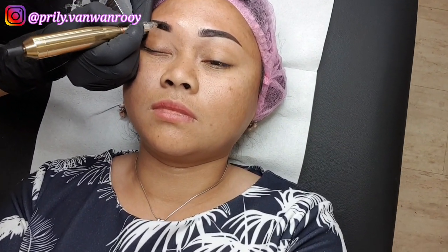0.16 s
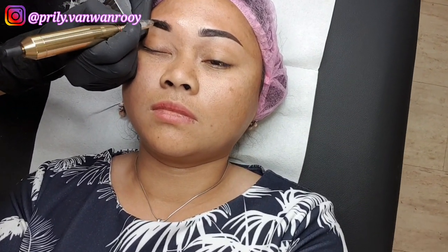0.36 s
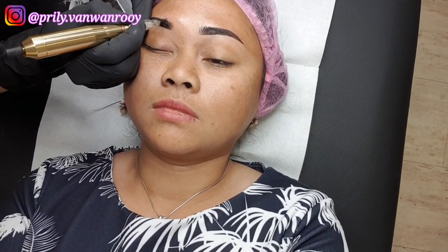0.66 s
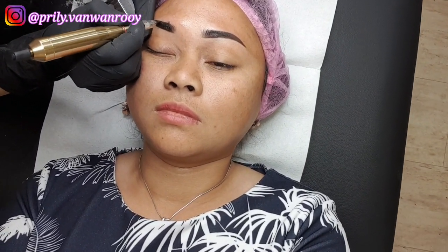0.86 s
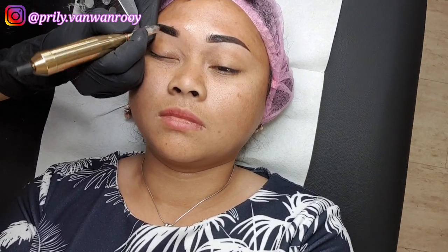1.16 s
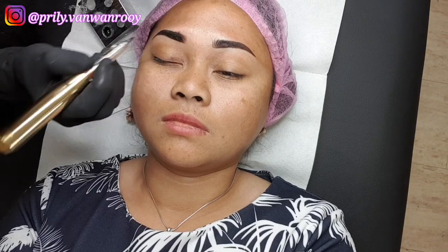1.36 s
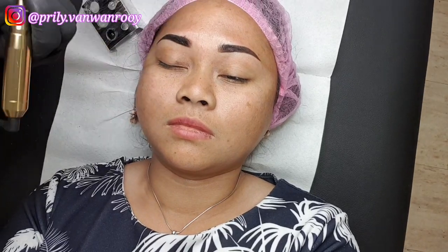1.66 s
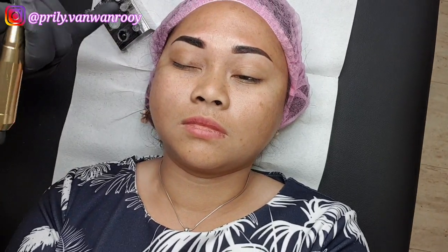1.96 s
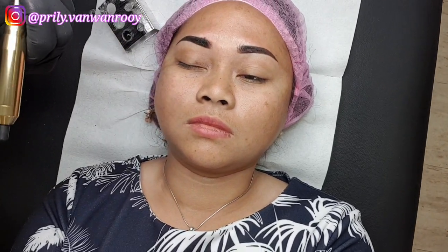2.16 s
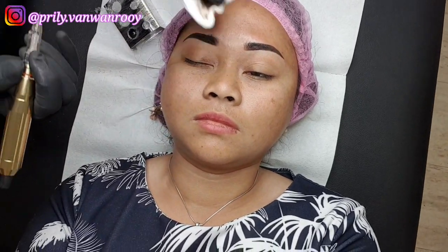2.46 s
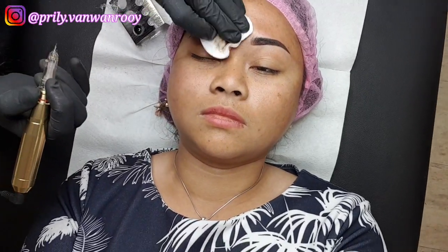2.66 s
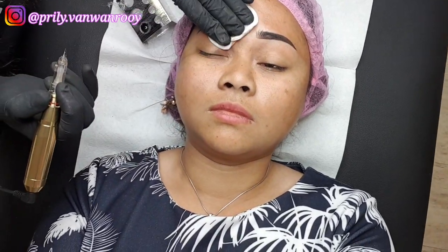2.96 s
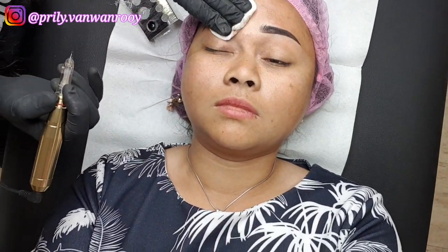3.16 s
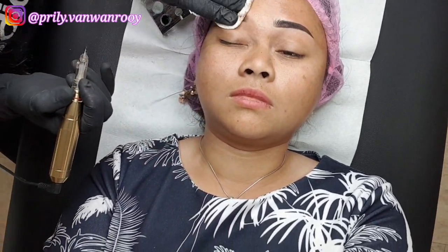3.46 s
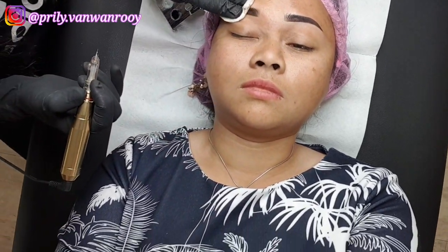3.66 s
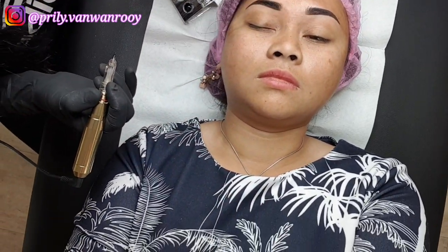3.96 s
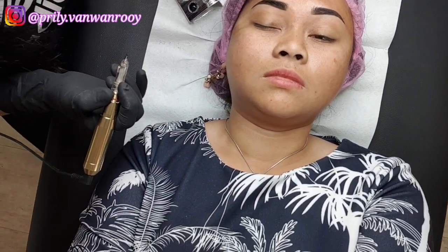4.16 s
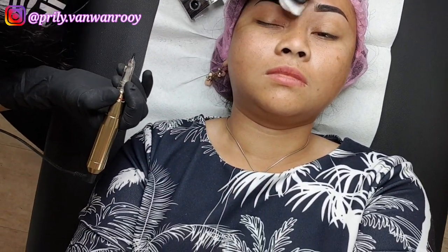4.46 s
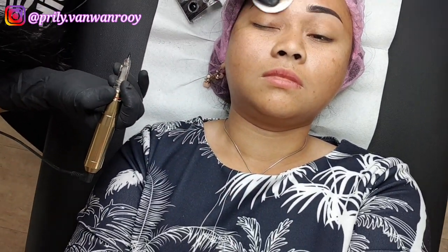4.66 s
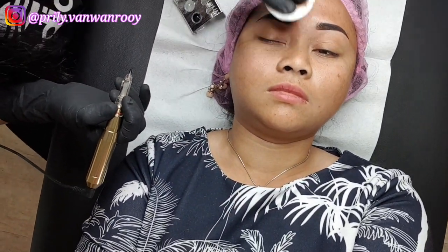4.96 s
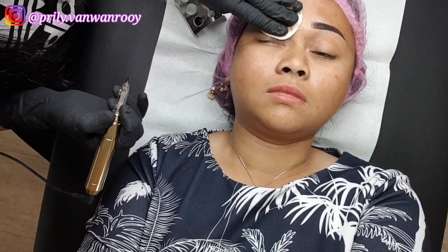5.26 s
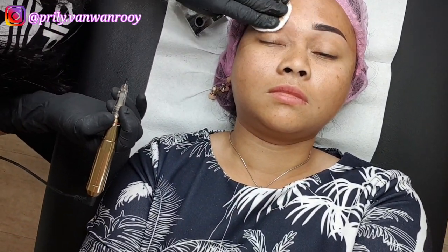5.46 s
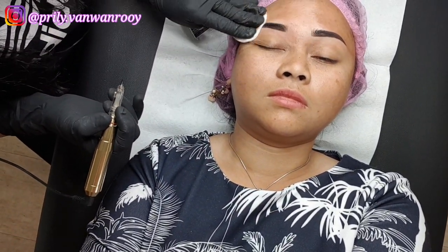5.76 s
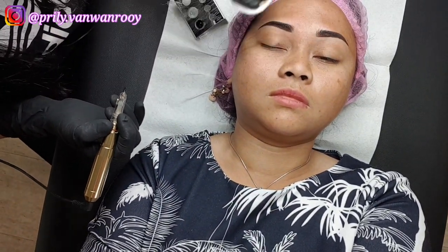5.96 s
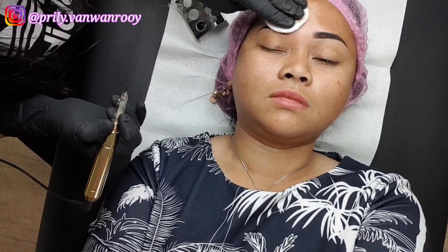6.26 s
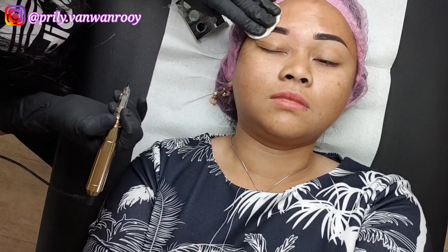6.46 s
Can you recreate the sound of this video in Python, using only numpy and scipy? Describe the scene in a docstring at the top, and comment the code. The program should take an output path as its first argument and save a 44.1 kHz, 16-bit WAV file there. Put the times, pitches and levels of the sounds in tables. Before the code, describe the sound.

Steady fine electric buzz and thin high whine in a quiet room, with brief crackly needle bursts at first, then a few tiny taps.

```python
"""In a quiet treatment room a small rotary pen machine runs near a two-port microphone. From the start its cam clicks
ring the metal shell, its drive whines thinly, ventilation rumbles in the room's low resonances under a faint hiss,
and a low hum and faint low tones come and go. In the first second and a quarter the needle ticks and scratches
on skin in seven short strokes. Then the hand carries the pen off to the right, and small objects tap nearby.
Contacts are impulses through resonances, air is filtered noise, whine and low tones are sines."""
import sys
import numpy as np
from scipy import signal
from scipy.fft import rfft, irfft, next_fast_len
from scipy.io import wavfile
from scipy.ndimage import uniform_filter1d, map_coordinates

SR = 44100
rng = np.random.default_rng(int(sys.argv[2]) if len(sys.argv) > 2 else 0)


def persist_wave(psi):
    """Save psi, clipped to +-1, as 16-bit WAV."""
    counts = np.round(np.clip(psi, -1, 1) * 32767).astype(np.int16)
    wavfile.write(sys.argv[1], SR, np.atleast_2d(counts).T)


N = 291942


def amp(db):
    """Gain of a level in dB."""
    return 10 ** (np.asarray(db) / 20)


def unit(x):
    """x scaled to rms 1."""
    return x / np.sqrt(np.mean(x ** 2) + 1e-20)


def along(points, hz):
    """Values of (Hz, value) points, read along a log frequency axis."""
    f, v = np.transpose(points)
    return np.interp(np.log(hz + 1), np.log(f + 1), v)


def curves(rows):
    """One value per sample for each column after the time."""
    s, *cols = np.transpose(rows)
    return [np.interp(np.arange(N) / SR, s, c) for c in cols]


def wobble(rate):
    """A smooth random curve, rate knots a second."""
    knots = rng.standard_normal(int(N * rate / SR) + 4)
    return map_coordinates(knots, [np.arange(N) * rate / SR])


def filtered(x, response):
    """x passed through a complex response of frequency."""
    m = next_fast_len(N + SR // 2)
    return irfft(rfft(x, m) * response(np.fft.rfftfreq(m, 1 / SR)), m)[..., :N]


def modes(table):
    """Causal response of a set of resonances, neighbours in opposite sign."""
    def response(f):
        return sum((-1) ** k * amp(db) * 1j * f * w / (c * c - f * f + 1j * f * w)
                   for k, (c, w, db) in enumerate(table))
    return response


def ring(drive, part, shift=1):
    """A soft contact builds a part's ring up gradually: its modes act twice; rms 1."""
    return unit(filtered(drive, lambda hz: modes(part)(hz / shift) ** 2))


def gliding(drive, part, shift, shifts):
    """A ring whose pitch follows shift, cross-faded between fixed shifts."""
    distance = np.abs(np.clip(shift, shifts[0], shifts[-1]) - shifts[:, None])
    near = np.clip(1 - distance / (shifts[1] - shifts[0]), 0, 1)
    return sum(np.sqrt(w) * ring(drive, part, k) for w, k in zip(near, shifts))


def pulses(seconds, sizes):
    """Impulses placed between samples by a windowed sinc."""
    at = np.clip(seconds * SR, 8, N - 10)[:, None]
    index = np.floor(at) + np.arange(-7, 9)
    kernel = np.sinc(index - at) * np.cos(np.pi * (index - at) / 16) ** 2
    return np.bincount(index.astype(int).ravel(), (kernel * sizes[:, None]).ravel(), N)


def pair(left_db):
    """Gains of the two microphone ports for a left-minus-right level."""
    return amp(np.array([left_db / 2, -left_db / 2]))


def surroundings(x, wet_db, t60, hold, lag):
    """The direct sound reaches the left port lag seconds late; reflections off hand, couch and walls differ
    at each port and change as the hand moves, every hold seconds."""
    wet, t, step = np.zeros((2, N + SR)), np.arange(SR // 8) / SR, int(hold * SR)
    for start in range(-step, N, step):
        first = max(start, 0)
        part = x[first:start + 2 * step] * np.hanning(2 * step)[max(-start, 0):N - start]
        tail = rng.standard_normal((2, len(t))) * amp(-60 * t / t60) * (t > .0008)
        echo = rfft(tail)
        # many paths: evening out the spectrum lets no pitch stand out
        tail = irfft(echo / uniform_filter1d(np.abs(echo), size=9), len(t))
        heard = signal.fftconvolve(part[None], tail / np.linalg.norm(tail[0]), axes=1)
        wet[:, first:][:, :heard.shape[1]] += heard
    direct = filtered(x, lambda hz: np.exp(-1j * np.pi * hz * lag * np.array([[1], [-1]])))
    return (direct + amp(wet_db) * wet[:, :N]) / np.sqrt(1 + amp(wet_db) ** 2)


# Needle strokes on skin. Each row: start in seconds, length in seconds, growth of the tick lag in turns a second.
STROKES = [(0.049, 0.078, 1.7), (0.216, 0.093, -0.5), (0.386, 0.12, -1), (0.58, 0.1, 2.5),
           (0.776, .105, -1), (0.995, 0.0815, 0.1), (1.167, 0.0892, -0.8)]


def stroking():
    """0 between the strokes, swelling to 1 in the middle of each."""
    t = np.arange(N) / SR
    return sum(np.sin(np.pi * np.clip((t - start) / length, 0, 1)) for start, length, *_ in STROKES)


# Slow course of the shaft speed, before the extra dip in each stroke.
# Each row: time in seconds, speed in turns a second.
BASE_SPEED = [(0, 89.0), (.13, 88.2), (.35, 89.5), (.55, 88.0), (.75, 88.6), (.93, 88.0), (1.15, 90.0),
              (1.38, 91.3), (1.6, 91.0), (2.43, 90.55), (2.65, 91.1), (2.98, 90.9), (3.2, 91.55),
              (3.6, 91.05), (4.3, 90.45), (5.55, 89.95), (5.84, 91.5), (6.1, 92.4), (6.62, 92.6)]
DRAG = 1.2  # further turns a second lost in the middle of a stroke


def speed():
    """Turns a second: the slow course less an extra dip from the drag of the skin in each stroke."""
    return curves(BASE_SPEED)[0] - DRAG * stroking()


def passing(share):
    """Times at which the shaft passes a share of its turn."""
    turns = np.cumsum(speed()) / SR
    return np.interp(np.arange(int(turns[-1])) + share, turns, np.arange(N) / SR)


# Cam contacts in one turn. Each row: share of the turn, level into nose, into grip and into body in dB.
CAM_CONTACTS = [(.99, 0, -14, -10), (.53, -1.5, -6, -10), (.63, -6, -20, -8), (.10, -8, -3, -6),
                (.19, -16, 0, 0), (.45, -14, 0, -2), (.82, -20, -12, -5)]
# How the pen faces the microphone.
# Each row: time in seconds, nose ring level in dB, nose pitch in Hz, grip ring level in dB.
PEN_FACING = [(0, -46, 10560, -62), (.3, -47, 10090, -66), (.6, -44.5, 10150, -57), (.85, -48, 10280, -61),
              (1.05, -43.5, 10300, -55), (1.2, -46, 10400, -59), (1.27, -42.5, 10340, -54),
              (1.34, -45, 10500, -54), (1.41, -54, 10360, -59), (1.49, -50.5, 10260, -61),
              (1.54, -60, 10100, -60), (1.68, -55, 10300, -53), (1.78, -61, 10200, -61),
              (1.87, -55, 10500, -57), (1.95, -57, 10200, -55), (2.06, -53, 10100, -53.5),
              (2.19, -46, 10070, -51.5), (2.32, -50.5, 10100, -56.5), (2.45, -59.5, 10400, -53),
              (2.53, -53.5, 10200, -54.5), (2.66, -50, 10300, -58), (2.85, -58.5, 10400, -54.5),
              (3.03, -55, 10300, -53), (3.25, -56, 10320, -57.5), (3.72, -58.5, 10160, -61),
              (3.9, -59, 10300, -58), (4.04, -62, 10130, -61.5), (4.22, -54.5, 10160, -59),
              (4.54, -57.5, 10460, -58.5), (4.9, -55.5, 10430, -60), (5.6, -59, 10150, -62),
              (5.85, -57, 10320, -63.5), (6.25, -59.5, 10500, -63.5), (6.62, -54.5, 10480, -61)]
# The hand carries the pen off to the right. Each row: time in seconds, body rattle in dB outside strokes,
# left minus right in dB, mean reflections of the shell in dB, share of the nose heard side-on from 0 to 1.
CARRY = [(0, -54.5, 0, -9, 0), (1.2, -57, 0.5, -8.5, 0.07), (1.36, -56, 0.5, -6, 0.17),
         (1.55, -58.5, -3, -7, 0.5), (2.3, -57, -1.5, -10, 0.2), (2.6, -60.5, -2, -4, 1),
         (3.7, -61.5, -2.5, -1, 0.9), (4.3, -57, -1, -4.5, 0.7), (5.5, -60, -2.5, -1.5, 0.45),
         (6.62, -60, -2, -5, 0.6)]
# Resonances of the shell, before ring() doubles their dB and any pitch shift.
# Each row: pitch in Hz, width in Hz, level in dB.
NOSE_MODES = [(10150, 2140, 0.5), (11600, 300, -2), (9560, 1200, -5), (14600, 1100, -21)]
NOSE_SIDE_MODES = [(10080, 380, 0), (11100, 900, -7)]  # same columns: side-on only a narrow ring is left
GRIP_MODES = [(7334, 528, -3.5), (7940, 1070, 17.5), (8500, 1500, 3)]  # same columns
COLLAR_MODES = [(9450, 600, 0)]  # same columns
BODY_MODES = [(3980, 430, 3.5), (4320, 365, 4.5), (4820, 320, 6), (5650, 850, 4), (7310, 530, 4),
              (1830, 2200, -3.5), (3160, 490, -4.5)]  # same columns
TAIL_MODES = [(3480, 420, 0)]  # same columns: rear of the shell, heard once it turns to the microphone
# The grip ring slides as the fingers move. Each row: time in seconds, pitch in Hz.
GRIP_PITCH = [(0, 8300), (1.4, 8300), (1.58, 8300), (1.8, 7800), (1.9, 8300), (2.4, 8180), (3.28, 8040),
              (3.43, 7840), (3.61, 8000), (3.85, 7900), (4.06, 8020), (4.9, 7800), (5.18, 8000),
              (5.73, 7640), (6.62, 7780)]
GRIP_HZ = 7975  # pitch at which the grip table holds
# Strength of the collar ring. Each row: time in seconds, level in dB.
COLLAR_LEVEL = [(0, -75), (1.15, -70), (1.3, -61), (1.4, -58), (1.55, -62), (1.85, -54), (1.97, -54),
                (2.19, -57), (2.34, -59), (2.46, -57), (2.66, -52), (2.83, -72), (3.1, -56), (3.35, -56),
                (3.73, -70), (4.0, -61), (4.23, -72), (6.62, -71)]
# Strength of the tail ring. Each row: time in seconds, level in dB.
TAIL_LEVEL = [(0, -81), (2.2, -76), (2.6, -81), (3.3, -79), (3.8, -72), (5.0, -72), (5.8, -70), (6.62, -71)]
STROKE_RATTLE_DB = 2  # the body rattles harder in a stroke
BODY_ECHO_DB = 9.5  # the body radiates all round, so more of it arrives reflected
ECHO_SWING_DB, TREMBLE_DB = 1.5, .8  # drift of the reflections, and the unsteady hand
PORT_LAG, BODY_LAG = 2.6e-5, 5e-5  # seconds by which shell and body reach the left port later


def cam():
    """Each contact repeats turn after turn and rings several parts of the shell; the shaft runs slightly unevenly."""
    uneven = 8e-6 * wobble(30) + 0.000142 * wobble(6)  # seconds
    scatter = [4e-6, 6e-6, 2.5e-5]  # seconds for nose, grip and body, which rattles more loosely
    load = np.clip(89.8 - speed(), 0, 2)  # work on skin slows the shaft and loosens the contacts
    drive = np.zeros((3, N))
    for share, *into_db in CAM_CONTACTS:
        s = passing(share)
        chance = rng.standard_normal((len(s), 4))
        index = (s * SR).astype(int)
        loose = 1 + 0.94 * load[index]
        s = s + uneven[index]
        for k in range(3):
            times = s + loose * scatter[k] * chance[:, k]
            drive[k] += amp(into_db[k]) * pulses(times, amp(1.58 * chance[:, 3]))
    to_nose, to_grip, to_body = drive
    nose_db, nose_hz, grip_db = curves(PEN_FACING)
    body_db, left_db, echo_db, side = curves(CARRY)
    body_db = body_db + STROKE_RATTLE_DB * stroking()
    wet_db = echo_db + ECHO_SWING_DB * wobble(4.5)

    narrow = gliding(to_nose, NOSE_SIDE_MODES, nose_hz / NOSE_SIDE_MODES[0][0], np.linspace(.985, 1.065, 7))
    grip = gliding(to_grip, GRIP_MODES, curves(GRIP_PITCH)[0] / GRIP_HZ, np.linspace(.94, 1.06, 5))
    wide = gliding(to_nose, NOSE_MODES, nose_hz / NOSE_MODES[0][0], np.linspace(.98, 1.04, 4))
    side = np.clip(side, 0, 1)
    nose = np.sqrt(1 - side) * wide + np.sqrt(side) * narrow
    shell = amp(nose_db) * nose + amp(grip_db) * grip
    shell += amp(curves(COLLAR_LEVEL)[0]) * ring(to_nose, COLLAR_MODES, 0.92)
    body = amp(body_db) * ring(to_body, BODY_MODES, 0.89)
    body += amp(curves(TAIL_LEVEL)[0]) * ring(to_body, TAIL_MODES)

    heard = surroundings(shell, wet_db, t60=.04, hold=.2, lag=PORT_LAG)
    heard += surroundings(body, wet_db + BODY_ECHO_DB, t60=.03, hold=.12, lag=BODY_LAG)
    return heard * amp(TREMBLE_DB * wobble(10)) * pair(left_db)


# Strength of the whine before its throb. Each row: time in seconds, level in dB.
WHINE_LEVEL = [(0, -66), (.2, -63), (1.31, -64), (1.84, -54), (1.94, -56), (2.16, -52), (2.67, -57),
               (2.85, -61), (3.65, -64), (3.76, -74), (3.85, -68), (4.54, -65), (4.9, -70), (5.27, -67),
               (5.7, -63), (6.3, -68), (6.47, -63), (6.62, -64)]
# Companions of the whine. Each row: pitch in Hz, level in dB relative to the whine.
WHINE_SIDES = [(9200, -17), (1127, -29.5)]
WHINE_HZ = 8783


def whine():
    """A thin tone of the motor drive, steady in pitch, with weak companions, throbbing a little with each turn."""
    t = np.arange(N) / SR
    throb = 1 + .25 * np.cos(2 * np.pi * np.cumsum(speed()) / SR)
    sines = sum(amp(db) * np.sin(2 * np.pi * hz * t) for hz, db in [(WHINE_HZ, 0)] + WHINE_SIDES)
    return np.sqrt(2) * amp(curves(WHINE_LEVEL)[0]) * throb * sines * pair(-5)[:, None]


def air_noise(colour, alike, lean):
    """Stereo noise with a given likeness and lean of the two ports; their mean has rms 1."""
    def turn(hz):
        return np.arccos(np.clip(along(alike, hz), -1, 1)) / 2

    noise = rng.standard_normal((2, N))
    mid, side = filtered(noise, lambda hz: colour(hz) * [np.cos(turn(hz)), np.sin(turn(hz))])
    both = filtered(np.array([mid + side, mid - side]), lambda hz: pair(along(lean, hz)))
    return both / np.sqrt(np.mean(both.mean(axis=0) ** 2))


# Ventilation strength by band. Each row: time in seconds, deep, low, duct and vent levels in dB before gusts.
AIR_LEVEL = [(0, -41.5, -45.5, -62, -65.5), (.7, -50, -49.5, -60, -69.5), (1.4, -53, -50.5, -60, -70),
             (2.2, -52.5, -51, -60, -67.5), (2.8, -49.5, -51.5, -58.5, -65), (3.8, -54, -51.5, -58, -65),
             (4.3, -53, -52, -60.5, -64), (5.298, -54.5, -50, -58.5, -66), (5.9, -49, -50.5, -57.5, -62.5),
             (6.62, -52, -54, -58.5, -67)]
# Resonances of the air in the room, before their contrast is raised.
# Each row: pitch in Hz, width in Hz, level in dB.
DEEP_MODES = [(41.7, 5.7, 8), (34.2, 8.7, -10), (62.8, 6.3, 12)]
LOW_MODES = [(96.1, 13.2, -4), (128.5, 5.2, -1), (156.5, 8.4, -3), (172.2, 8.1, -6), (187.3, 17.2, -9.5)]  # same columns
DUCT_MODES = [(266.5, 6.6, -3), (294.3, 10, -2.5), (332.3, 13.7, -1.5), (366.2, 18.4, -0.5),
              (425, 81, -9.5), (216, 30, -7.5)]  # same columns
VENT_MODES = [(787, 117, 0)]  # same columns
# Ventilation at the two ports. Each row: frequency in Hz, left-right likeness from -1 to 1.
AIR_ALIKE = [(40, 0.92), (130, 0.99), (290, 0.64), (640, 0.22), (1410, -0.12)]
# Ventilation's lean to one port. Each row: frequency in Hz, left minus right in dB.
AIR_LEAN = [(60, 4.5), (110, -1), (200, 1.5), (380, 7), (700, 18.5), (1290, 2.5)]
GUST_DB = 1  # each band also drifts by itself


def ventilation():
    """Air noise seen through the room's resonances, with dark valleys between them."""
    out = np.zeros((2, N))
    for db, table in zip(curves(AIR_LEVEL), (DEEP_MODES, LOW_MODES, DUCT_MODES, VENT_MODES)):
        noise = air_noise(lambda hz: np.abs(modes(table)(hz)) ** 1.282, AIR_ALIKE, AIR_LEAN)
        out += amp(db + GUST_DB * wobble(6)) * noise
    return out


# Colour of the room hiss. Each row: frequency in Hz, relative density in dB per Hz.
HISS_COLOUR = [(200, -37), (600, -11.5), (1200, -5), (2800, -1), (4000, 3.5), (6000, 2), (9000, 7),
               (12500, 5.5), (13800, -1), (14400, 8.5), (15100, 1), (15700, -21)]
# Hiss at the two ports. Each row: frequency in Hz, left-right likeness from -1 to 1.
HISS_ALIKE = [(1000, .2), (3000, 0)]
# Hiss's lean to one port. Each row: frequency in Hz, left minus right in dB.
HISS_LEAN = [(1000, 1), (9000, 0), (14500, -10)]
# Strength of the hiss before its patches. Each row: time in seconds, level in dB.
HISS_LEVEL = [(0, -58), (1.3, -57), (2.3, -56.5), (2.6, -61.5), (3.3, -59.5), (4.2, -59.5), (6.62, -60.5)]
HISS_PATCH_DB = 1.5  # the hiss is uneven in time and pitch


def hiss():
    """The faint noise of the room, with slow patches of more and less."""
    noise = air_noise(lambda hz: amp(along(HISS_COLOUR, hz)), HISS_ALIKE, HISS_LEAN)
    z = signal.stft(noise, nperseg=512)[2]
    field = uniform_filter1d(rng.standard_normal(z.shape[1:]), size=5, axis=0)
    field = uniform_filter1d(field, size=20, axis=1)
    patchy = signal.istft(z * amp(HISS_PATCH_DB * unit(field)), nperseg=512)[1][:, :N]
    return amp(curves(HISS_LEVEL)[0]) * patchy


# Rise and fall of the deep hum, before a small random part. Each row: time in seconds, level in dB.
HUM_LEVEL = [(0, -45), (.5, -42.5), (1.0, -45), (1.3, -48.5), (1.99, -41), (2.15, -50.5), (2.55, -45),
             (2.8, -69), (3.26, -56), (3.7, -54.5), (4.35, -46.5), (5.0, -54.5), (5.6, -53), (6.1, -62),
             (6.62, -63)]
# Rise and fall of the hum about an octave up, before a small random part. Each row: time in seconds, level in dB.
HUM_ABOVE_LEVEL = [(0, -39.5), (.22, -70), (.66, -56), (.88, -61), (1.22, -60.5), (1.47, -44),
                   (1.77, -49.5), (1.92, -43), (2.3, -60.5), (2.42, -49), (2.9, -59), (3.55, -52),
                   (4.0, -55), (4.2, -45.5), (5.53, -60), (6.1, -43), (6.62, -69)]
HUM_HZ, HUM_ABOVE_HZ = 49.66, 102.4
HUM_SPREAD_HZ, HUM_SPREAD_DB = 0.92, 1  # size of the random part in pitch and level


def hum():
    """Two low narrow tones with random rise and fall, as in narrow room noise; a little louder at the left port."""
    out = np.zeros(N)
    for hz, level in ((HUM_HZ, HUM_LEVEL), (HUM_ABOVE_HZ, HUM_ABOVE_LEVEL)):
        gain = amp(curves(level)[0] + HUM_SPREAD_DB * wobble(10))
        out += gain * np.sin(2 * np.pi * np.cumsum(hz + HUM_SPREAD_HZ * wobble(3.96)) / SR)
    return np.sqrt(2) * out * pair(1.2)[:, None]


# Faint tones that come and go. Each row: start in seconds, rise in seconds, 60 dB decay time in seconds,
# starting pitch in Hz, drift in Hz a second, level in dB before a small random part.
TONES = [(0, 0.15, 0.94, 69.4, -7, -47), (0, 0.39, 3.9, 43.43, -3.5, -42.5),
         (.3, 0.59, 0.73, 93.9, -2.5, -55), (.9, 0.72, 2.1, 160.6, 0, -53.5),
         (1.202, 0.57, 8, 65, -3.5, -54), (0.45, 0.46, 1.5, 127.6, -3.5, -50),
         (0.898, 0.13, 0.6, 327.4, -4, -59.5), (1.5, 0.45, 6, 194.1, -0.5, -61.5),
         (2.5, 0.16, 18, 292.8, -3, -62), (2.8, 0.26, 3.7, 262.5, 0, -63), (2.8, 0.51, 9.2, 331, -2, -77.5),
         (4.1, 0.3, 36, 128.9, -1, -52), (5.002, 0.78, 14, 222.6, -1, -67.5),
         (4.6, 0.14, 8.5, 362, -1.5, -61), (5.7, 0.11, 9.1, 367.6, -3, -62.5)]


def tones():
    """Faint low sines that swell, drift a little and die away."""
    out = np.zeros(N)
    for start, rise, t60, hz, drift, db in TONES:
        t = np.clip(np.arange(N) / SR - start, 0, None)
        swell = np.sin(np.pi / 2 * np.clip(t / rise, 0, 1)) ** 2
        decay_db = -60 * np.clip(t - rise, 0, None) / t60
        gain = swell * amp(db + decay_db + 0.72 * wobble(4.96))
        out += gain * np.sin(2 * np.pi * (hz * t + drift * t ** 2 / 2) + 0.96 * wobble(2.896))
    return np.sqrt(2) * out * pair(2.7)[:, None]


# How hard the needle meets the skin. Each row: time in seconds, tick drive in dB, knock drive in dB.
PRESS = [(.04, -41, -45), (.051, -28, -40), (.074, -25, -36), (.085, -23, -32), (.098, -24, -35),
         (.109, -16, -33), (.12, -32, -40), (.144, -33, -40), (.16, -50, -45), (.2, -36, -45),
         (.222, -27, -35), (.233, -20, -30), (.244, -19, -26), (.256, -24, -14), (.279, -27, -24),
         (.295, -50, -45), (.38, -39, -45), (.402, -31, -35), (.413, -15.5, -31), (.424, -24, -33),
         (.436, -28, -35), (.447, -15, -30), (.458, -18, -30), (.47, -27, -30), (.494, -20, -33),
         (.505, -23, -35), (.515, -42, -45), (.575, -42, -45), (.595, -26, -22), (.606, -18, -22),
         (.619, -19, -20), (.63, -15, -15), (.642, -19, -10), (.655, -22, -17), (.68, -38, -26),
         (.765, -40, -45), (.788, -29, -38), (.799, -20, -33), (.811, -13.5, -28), (.822, -13.5, -34),
         (.834, -18, -28), (.846, -16, -32), (.857, -19, -34), (.869, -24, -38), (.881, -36, -42),
         (.915, -47, -45), (.985, -38, -45), (1.005, -22, -32), (1.016, -18, -19), (1.027, -18, -13),
         (1.039, -16.5, -14), (1.05, -20, -19), (1.06, -27, -15), (1.072, -25, -16), (1.085, -50, -45),
         (1.16, -45, -45), (1.172, -28, -40), (1.194, -30, -38), (1.205, -25, -34), (1.228, -24, -24),
         (1.239, -19, -46), (1.25, -60, -60), (1.3, -120, -120)]
# Colour of a tick. Each row: frequency in Hz, relative density in dB per Hz.
NEEDLE_COLOUR = [(1180, -18.5), (2000, -32), (2540, -17), (3020, -50), (3460, -26), (4750, -3), (5990, -12),
                 (6870, 4), (7680, -9), (9270, -9), (10000, -23), (12000, 1), (12900, 2.5), (13700, 3),
                 (15500, -5)]
# The cartridge knocks when the needle goes deep. Each row: pitch in Hz, width in Hz, level in dB.
KNOCK_MODES = [(2970, 270, 0), (1560, 180, -4)]
# the lower part of a tick follows the pressure only partly: pivot level, upper edge, share followed
DULL_DB, DULL_TOP_HZ, DULL_FOLLOWS = -26.5, 8500, .6


def needle():
    """One tick a turn, as hard as the needle is pressed; its place in the turn drifts as each stroke goes on."""
    s = passing(0.72)
    chance = rng.standard_normal((len(s), 6))
    tick_db, knock_db = (c[(s * SR).astype(int)] for c in curves(PRESS))
    for start, length, lag in STROKES:
        done = np.clip((s - start) / length, 0, 1)
        s = s + (done < 1) * done * length * lag / 88  # 88 turns a second turn the lag into seconds
    s = s + 0.000154 * chance[:, 0]

    def ticks(size):
        """The points do not land quite together, and the needle bar rebounds."""
        second = pulses(s + 0.000317 * np.abs(chance[:, 4]), 0.28 * size * np.sign(chance[:, 5]))
        rebound = pulses(s + 0.000894, 0.23 * size * chance[:, 2])
        return pulses(s, size) + second + rebound

    def low(hz):
        """Share of the dull lower part."""
        return 1 / (1 + (hz / DULL_TOP_HZ) ** 8)

    partly_db = DULL_DB + DULL_FOLLOWS * (tick_db - DULL_DB) + 1.6 * chance[:, 1]
    dull_db = np.where(tick_db > -44, partly_db, tick_db)
    out = filtered(ticks(amp(tick_db)), lambda hz: amp(along(NEEDLE_COLOUR, hz) + 7) * (1 - low(hz)))
    out += filtered(ticks(amp(dull_db)), lambda hz: amp(along(NEEDLE_COLOUR, hz) + 8.0) * low(hz))
    out += filtered(pulses(s + 0.00108, amp(knock_db + chance[:, 3])), modes(KNOCK_MODES))
    return surroundings(out, wet_db=-8, t60=.02, hold=.02, lag=2e-5)


# Colour of the points dragging over skin. Each row: frequency in Hz, relative density in dB per Hz.
SCRATCH_COLOUR = [(3500, -28), (5000, -10), (8000, -12), (11000, -14), (13000, -6), (15000, 6)]
SCRATCH_DB = -32  # relative to the tick drive


def scratch():
    """A fine noise of the points on skin, following the pressure and pulsing twice a turn."""
    press = uniform_filter1d(amp(curves(PRESS)[0] + SCRATCH_DB), size=SR // 40)
    pulse = np.cos(2 * np.pi * np.cumsum(speed()) / SR) ** 2 + .3
    noise = rng.standard_normal((2, N)) + rng.standard_normal(N)  # partly shared by the ports
    return press * pulse * unit(filtered(noise, lambda hz: amp(along(SCRATCH_COLOUR, hz))))


# Small taps nearby. Each row: time in seconds, strike level in dB before a common 19 dB lift,
# pitch as a ratio to the ring table, left minus right in dB.
TAPS = [(1.793, -38.5, 1.08, -2), (1.7945, -46, 1.03, -6), (1.8126, -43, 1.03, -1), (2.065, -46, 1.45, -2),
        (4.173, -52, .89, -4), (4.18, -45, .85, -5), (4.185, -50, .6, -8), (4.19, -54, .86, -2),
        (4.33, -50, 1.35, -3)]
# Rings of the tapped objects at ratio 1. Each row: pitch in Hz, width in Hz, level in dB.
TAP_MODES = [(2600, 900, 0), (3500, 800, 0), (4900, 1000, -5), (6700, 1200, -19)]
TAP_S, TAP_ROUGH = .012, .3  # the rough end of a contact: 60 dB decay in seconds, size relative to the click


def taps():
    """Short dry taps of small objects: a click with a brief rough tail into a few rings."""
    out, t = np.zeros((2, N)), np.arange(SR // 20) / SR
    for s, db, pitch, left_db in TAPS:
        burst = np.zeros((2, N))
        rough = TAP_ROUGH * amp(-60 * t / TAP_S) * rng.standard_normal((2, len(t)))
        burst[:, round(s * SR):][:, :len(t)] = amp(db + 19) * ((t == 0) + rough)
        out += filtered(burst, lambda hz: modes(TAP_MODES)(hz / pitch)) * pair(left_db)[:, None]
    return out


def scene():
    """Pen, room air, low tones, needle on skin and taps, summed at the two ports."""
    running = cam() + whine() + ventilation() + hiss() + hum() + tones()
    return running + needle() + scratch() + taps()


TOP_HZ = 15780


def record(dry):
    """Nothing is kept from the band limit upwards."""
    return filtered(dry, lambda hz: hz < TOP_HZ)


dry = scene()
out = record(dry)
persist_wave(out)
```